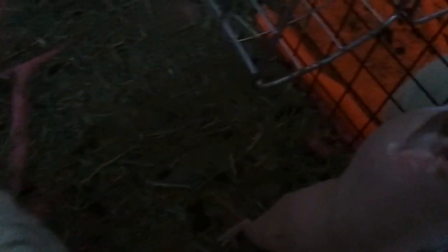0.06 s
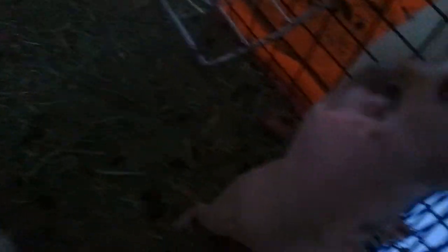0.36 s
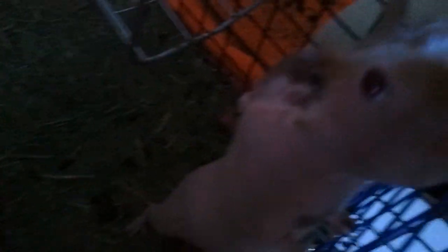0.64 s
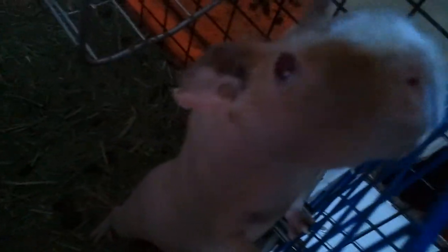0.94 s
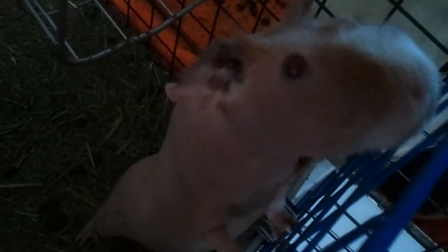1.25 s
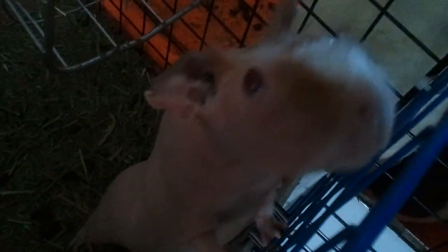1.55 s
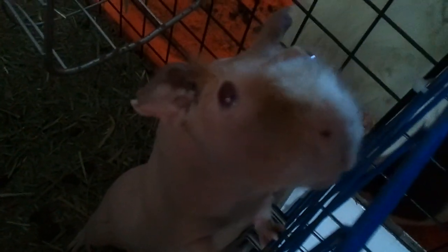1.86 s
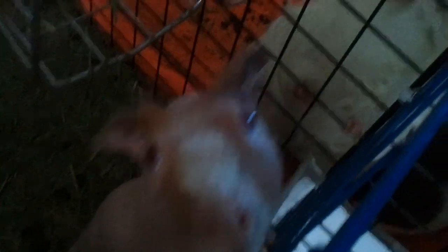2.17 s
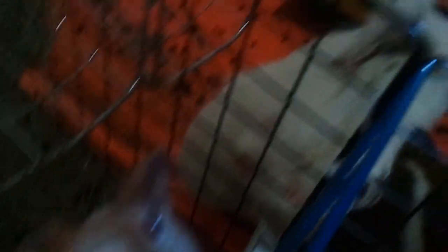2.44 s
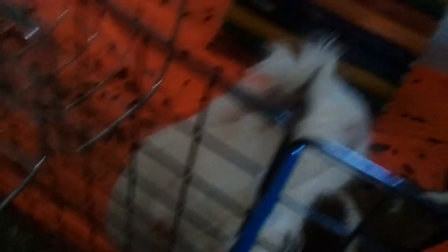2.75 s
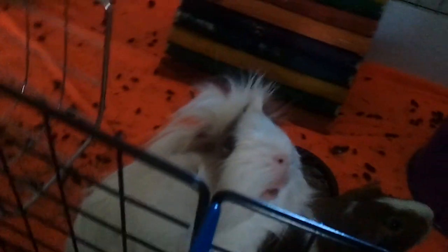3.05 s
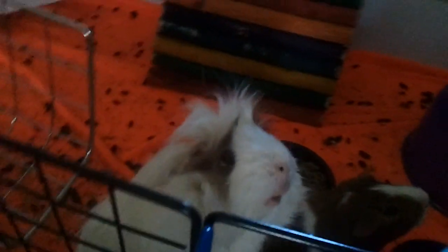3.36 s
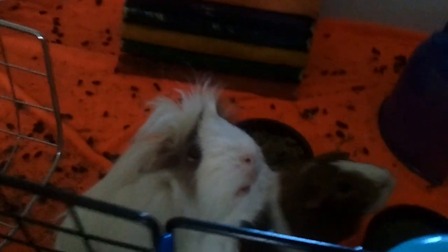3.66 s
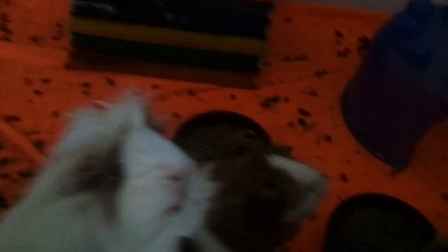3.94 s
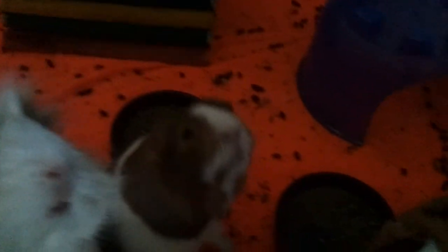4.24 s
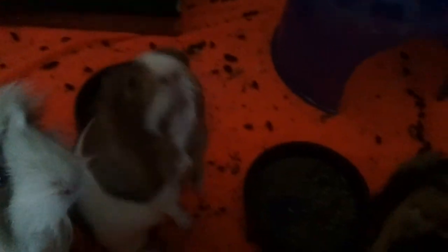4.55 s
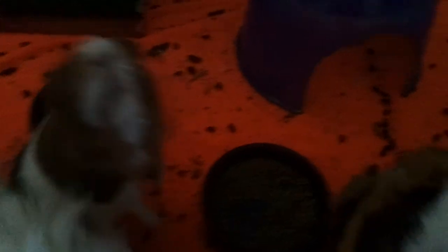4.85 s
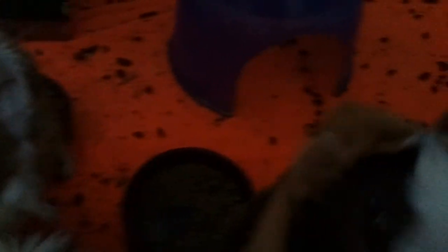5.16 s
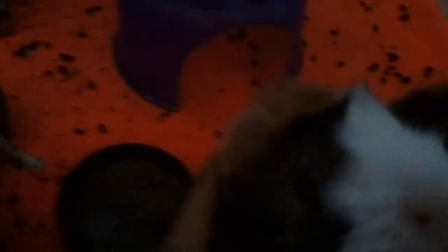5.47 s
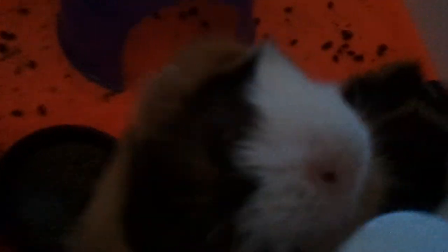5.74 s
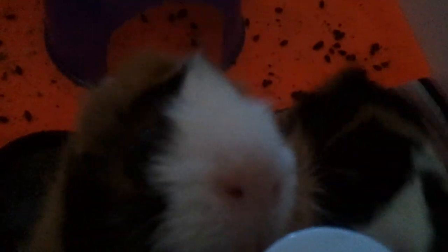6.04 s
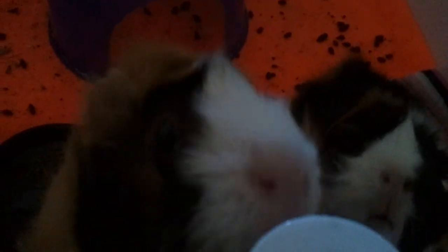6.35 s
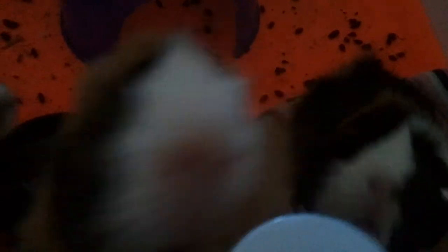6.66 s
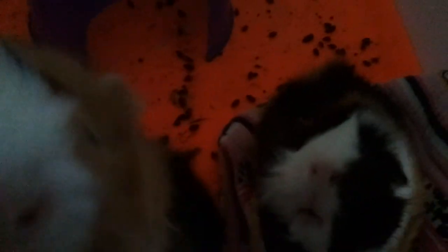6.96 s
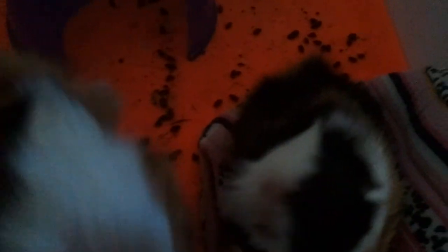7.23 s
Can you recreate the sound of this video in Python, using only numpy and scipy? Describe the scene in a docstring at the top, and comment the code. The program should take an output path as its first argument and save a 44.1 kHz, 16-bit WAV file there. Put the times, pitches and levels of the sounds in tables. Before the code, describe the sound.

Several guinea pigs squeak and whistle in quick rising calls over a hiss like running water and a low room hum.

```python
"""Overlapping wheeks of guinea pigs begging for food in an indoor pen: each call scoops low, then
the vocal folds tighten and whip it up into a whistle. Short peeps mix in; one animal squeals hoarsely.
A hiss like a running tap fills the room and dies away near the end, over a motor hum and rumble.
The pen is bumped a few times; late on, a stalk snaps and bedding rustles."""
import sys
import numpy as np
from scipy import signal
from scipy.fft import rfft, irfft
from scipy.io import wavfile

SR = 44100
rng = np.random.default_rng(int(sys.argv[2]) if len(sys.argv) > 2 else 0)


def wav_record(signal):
    """Record a signal, one row per channel, as 16-bit PCM in the file named by sys.argv[1]."""
    frames = np.transpose(np.atleast_2d(signal))
    bounded = np.clip(frames, -1, 1)
    # unit amplitude maps onto the largest positive 16-bit level
    quanta = np.round(bounded * 32767).astype(np.int16)
    wavfile.write(sys.argv[1], SR, quanta)


N = 330750
TIME_S = np.arange(N) / SR

# Wheeks: start/s, break/s, end/s, first f/Hz, knee f/Hz, top f/Hz, relative level/dB,
# whistle re scoop/dB, 2nd harmonic/dB, 3rd harmonic/dB
WHEEKS = [(0.0, 0.087, 0.115, 821, 969, 2310, -31.5, 4, -18, -27),
          (0.175, 0.236, 0.315, 706, 675, 2880, -43, 5, -1, -20),
          (0.255, 0.338, 0.352, 905, 650, 1450, -32.5, 12, -24, -13),
          (0.275, 0.372, 0.424, 702, 703, 1790, -38, -1, -11, -11),
          (0.524, 0.597, 0.709, 759, 706, 2954, -35, 0.5, -6, -28),
          (0.579, 0.671, 0.704, 700, 758, 1550, -37.5, 5, -9.5, -11),
          (0.881, 0.977, 1.114, 739, 691, 2970, -36, -3, -6, -11),
          (0.995, 1.068, 1.074, 687, 782, 1260, -38.5, -6, -5, -13),
          (1.177, 1.263, 1.313, 721, 700, 1517, -42, 8, -19, -11),
          (1.304, 1.424, 1.458, 570, 728, 1630, -40.5, 10, -8, -11),
          (1.327, 1.44, 1.47, 716.5, 807, 1960, -37.5, 10, -5, -21),
          (1.511, 1.583, 1.593, 664.5, 668, 1230, -40, -5, -11, -12),
          (1.631, 1.72, 1.726, 862, 635, 1330, -38, 6, -21, -24),
          (1.777, 1.849, 1.854, 793, 817, 1140, -38.5, 0, -23, -17),
          (1.816, 1.902, 1.913, 607, 568, 1260, -41, -6, -7, -9),
          (2.256, 2.334, 2.356, 744, 680, 1900, -37, -5, -15, -31),
          (2.309, 2.357, 2.387, 682, 642, 1530, -40, 0, -8, -8),
          (2.559, 2.633, 2.696, 774, 703, 2780, -34, -6, -11, -22),
          (2.828, 2.899, 2.996, 731, 693, 2960, -38.5, -4, -11, -24),
          (2.865, 2.93, 3.021, 739, 880, 2720, -38, -6, -12, -15),
          (3.133, 3.209, 3.248, 688, 705, 2840, -40.5, 2.5, -8, -19),
          (3.236, 3.335, 3.434, 739, 930, 3080, -41.5, 3, -4.5, -20),
          (3.308, 3.344, 3.363, 675, 756, 1324, -38, 10, -24, -22),
          (3.406, 3.446, 3.451, 781, 848, 1470, -36, -5, -18, -6),
          (3.549, 3.734, 3.852, 820, 784, 3020, -39.5, 5.5, -8, -3),
          (3.951, 4.056, 4.174, 668, 795, 3080, -38, 7.5, -8.5, -10.5),
          (4.028, 4.122, 4.178, 795, 763, 2770, -29.5, 4.5, -15, -7),
          (4.322, 4.442, 4.449, 706, 765, 1290, -30.5, 1, -12, -14.5),
          (4.473, 4.55, 4.552, 737, 803, 1520, -34, -3.5, -32, -21),
          (4.774, 4.842, 4.876, 799, 888, 2060, -27.5, -12, -18, -20),
          (4.924, 5.104, 5.143, 660, 885, 2660, -28, -5.5, -16, -10),
          (5.271, 5.352, 5.38, 818, 953, 2610, -31, 8, -14.5, -9),
          (5.432, 5.61, 5.641, 590, 984, 2950, -31.5, 13.5, -15.5, -17),
          (5.683, 5.846, 5.85, 610, 905, 1780, -30, 12, -10.5, -21),
          (5.765, 5.817, 5.818, 802, 894, 1390, -28.5, -11, -9, -11),
          (5.97, 6.124, 6.161, 656, 732, 1200, -35.5, -10, -8.5, -6.5),
          (5.995, 6.073, 6.075, 873, 735, 1400, -28.5, -20, -12.5, -18),
          (6.21, 6.296, 6.303, 858, 780, 1390, -28, -18, -21, -15),
          (6.423, 6.469, 6.498, 644, 816, 1192, -40.5, 4, -6.5, -8),
          (6.798, 6.814, 6.836, 970, 990, 1810, -41.5, 8, -15, -19)]
# Peeps: start/s, end/s, first f/Hz, last f/Hz, relative level/dB, 2nd harmonic/dB
PEEPS = [(0.0, 0.057, 685, 767, -41.5, -6), (0.048, 0.148, 554, 656, -40, -8),
         (0.303, 0.36, 525.6, 611, -38.5, -2.5), (0.748, 0.815, 742, 810, -37, -22),
         (0.832, 0.859, 933, 1030, -38, -12), (1.083, 1.137, 532, 626, -40.5, -15),
         (1.085, 1.114, 1096, 1080, -41.5, -7), (1.143, 1.176, 1170, 1184, -38, -23),
         (2.046, 2.1, 716, 768, -46, -23), (2.058, 2.135, 589, 584, -41.5, -8),
         (2.101, 2.161, 1148, 1047, -45, -16), (2.487, 2.568, 1010, 1276, -49, -15),
         (3.436, 3.518, 658, 842, -43, -14), (3.86, 3.897, 658, 672, -34.5, -14),
         (4.622, 4.729, 625, 806, -28.5, -9.5), (4.837, 4.869, 609, 653, -31, -11),
         (6.472, 6.522, 770, 809, -34.5, -18), (6.892, 6.945, 669, 777, -38, -20),
         (7.131, 7.185, 575, 870, -37.5, -6), (7.36, 7.434, 721, 747, -41, -22)]
# How well the voice carries: f/Hz, gain/dB
VOICE_CARRY = [(500, -3), (700, 1), (800, -2), (950, -2), (1200, 5), (1500, -5), (1800, -5.5), (2300, -5.5),
               (2700, 0), (3100, -3.5), (3500, -4)]
# Long whistle that sinks and climbs again: t/s, f/Hz, relative level/dB
LONG_WHISTLE = [(3.505, 752, -43), (3.555, 2334, -38), (3.61, 2407, -43), (3.655, 2045, -41),
                (3.705, 1392, -40), (3.735, 1630, -39), (3.765, 2810, -34.5), (3.82, 3390, -42)]
# Hoarse squeal: t/s, f/Hz, relative level/dB
SQUEAL = [(5.74, 1069, -48.5), (5.819, 1210, -41), (5.833, 1423, -38), (5.862, 1445, -40),
          (5.924, 1463, -37), (5.97, 1396, -47), (5.996, 1290, -40)]
# Squeal harmonics: number, gain/dB
SQUEAL_HARMONICS = [(1, -3), (2, -4), (3, 2), (4, -1), (5, -14.5)]
# Faint held whistle: t/s, f/Hz, relative level/dB
HELD_WHISTLE = [(5.84, 1159, -51), (5.89, 1134, -40.5), (6.02, 1120, -45), (6.2, 1165, -57),
                (6.55, 1133, -53), (6.78, 1167, -50.5)]
# Running water: t/s, level/dB
TAP_LEVEL = [(0, -35), (0.4, -35), (0.9, -36.5), (1.4, -38.5), (1.95, -36), (2.3, -37.5), (3.1, -40),
             (3.7, -38.5), (4.4, -36), (4.9, -32.5), (5.35, -35.5), (5.65, -35.5), (6.3, -38.5),
             (6.75, -42.5), (6.86, -49), (7.15, -56), (7.45, -57.5)]
# Water hiss: f/Hz, relative density/dB
TAP_SPECTRUM = [(500, -12.5), (900, -2.5), (1170, -4), (1650, -8.5), (2750, -5.5), (3600, -6), (5350, -3.5),
                (5520, 0), (5680, -3.5), (5850, 0), (6350, -2.5), (6850, -8.5), (7450, -19.5), (8000, -38)]
# Room rumble: t/s, level/dB
RUMBLE_LEVEL = [(0, -37), (1.9, -37), (3.0, -39.5), (3.8, -38.5), (4.7, -32.5), (6.0, -34.5), (7.5, -39)]
# Room rumble: f/Hz, relative density/dB
RUMBLE_SPECTRUM = [(15, -27.5), (30, -16), (42, -31.5), (50, -11), (72, -22.5), (95, -28), (150, -30),
                   (240, -30), (450, -37), (720, -37), (1000, -37.5), (1600, -41), (2000, -42.5),
                   (2800, -45), (6500, -66.5)]
# Faint room tones: f/Hz, peak re rumble/dB
ROOM_TONES = [(149, -13), (479.5, -21.5)]
# Motor hum: t/s, level/dB
HUM_LEVEL = [(0, -56), (.3, -34), (1.35, -47.5), (1.85, -34.5), (2.9, -43), (3.7, -45), (4.2, -34),
             (5.05, -49), (5.4, -36), (5.9, -49.5), (6.4, -45.5), (7.5, -51.5)]
# Bumps on the pen: t/s, thud level/dB, thud f/Hz, knock and tick trim/dB
BUMPS = [(0.313, -30, 118, -5), (0.859, -30, 155, -1), (1.219, -28, 122, -13), (4.177, -30.5, 81, 8.5),
         (4.686, -10.5, 101, -22), (4.748, -17.5, 86, -22), (7.383, -31, 132, -13)]
# Bedding rustles: start/s, length/s, level/dB
RUSTLES = [(6.919, .08, -36.5), (7.203, .03, -45)]
# Rustle, also the squeal's hiss: f/Hz, relative density/dB
RUSTLE_SPECTRUM = [(300, -18.5), (1200, -4), (3200, -2.5), (4500, -4.5), (6300, -5.5), (7500, -14.5)]


def from_db(db):
    return 10 ** (np.asarray(db) / 20)


def unit_rms(x):
    return x / np.sqrt(np.mean(x ** 2) + 1e-20)


def envelope(rows):
    """Gain over time from rows of t/s, level/dB."""
    return from_db(np.interp(TIME_S, *np.transpose(rows)))


def drift(rate_hz, size=N):
    """Slow random signal, rms about 1."""
    steps = np.arange(size) * rate_hz / SR
    return 1.2 * np.interp(steps, np.arange(4096), rng.standard_normal(4096))


def noise(spectrum):
    """Coloured noise, rms 1."""
    hz, db = np.transpose(spectrum)
    bins_hz = np.maximum(np.fft.rfftfreq(N, 1 / SR), 1)
    gain = from_db(np.interp(np.log(bins_hz), np.log(hz), db, left=-90, right=-90))
    return unit_rms(irfft(rfft(rng.standard_normal(N)) * gain, N))


def band(x, low_hz, high_hz):
    """Gentle band-pass, output rms 1."""
    return unit_rms(signal.sosfilt(signal.butter(2, [low_hz, high_hz], "band", fs=SR, output="sos"), x))


def add(out, start_s, sound):
    at = max(round(start_s * SR), 0)
    out[at:at + len(sound)] += sound[:max(N - at, 0)]


def room(x, early_db, tail_db, t60_s=.35):
    """Direct sound, close reflections off floor and walls, short diffuse tail."""
    t = np.arange(SR // 2) / SR
    tail = rng.standard_normal(len(t)) * from_db(-60 * t / t60_s) * np.clip(t / .031, 0, 1)
    early = np.zeros(len(t))
    early[(rng.uniform(.002, .02, 8) * SR).astype(int)] = rng.choice([-1, 1], 8)
    response = from_db(early_db) * early / np.linalg.norm(early)
    response += from_db(tail_db) * tail / np.linalg.norm(tail)
    return x + signal.fftconvolve(x, response)[:N]


def scoop(progress, first_hz, last_hz, sag=.0478):
    """Pitch of a call's low part: a glide that sags midway."""
    return first_hz * (last_hz / first_hz) ** progress * np.exp(-sag * np.sin(np.pi * progress))


def call_contour(t, hz, db, waver_db=1, waver_hz=90):
    """Rows of t/s, f/Hz, level/dB: effort wavers, and some pitches carry better."""
    waver = np.interp((t - t[0]) * waver_hz, np.arange(64), rng.standard_normal(64))
    carry_db = np.interp(hz, *np.transpose(VOICE_CARRY))
    return np.column_stack([t, hz, db + waver_db * waver + carry_db])


def wheek(start_s, break_s, end_s, first_hz, knee_hz, top_hz, db, whistle_db, second_db, third_db):
    """Contour and harmonics: the voice scoops, tightens to the break, whips up and levels off."""
    break_hz, tighten_s, tire_db = 1192, .017, .5
    t = np.linspace(start_s, end_s, 150)
    progress = np.interp(t, [start_s, break_s], [0, 1])
    tighten = (break_hz / knee_hz) ** np.exp(np.minimum(t - break_s, 0) / tighten_s)
    whip = (top_hz / break_hz) ** np.sin(np.interp(t, [break_s, end_s], [0, np.pi / 2]))
    hz = scoop(progress, first_hz, knee_hz) * tighten * whip
    effort_db = db + tire_db * (.5 - progress) + np.interp(hz, [1100, 2520], [0, whistle_db])
    return call_contour(t, hz, effort_db), [(1, 0), (2, second_db), (3, third_db), (4, third_db - 11.5)]


def peep(start_s, end_s, first_hz, last_hz, db, second_db):
    """Contour and harmonics of a scoop that never breaks."""
    t = np.linspace(start_s, end_s, 50)
    hz = scoop(np.linspace(0, 1, len(t)), first_hz, last_hz)
    return call_contour(t, hz, db), [(1, 0), (2, second_db), (3, -16.5)]


def voice(contour, harmonics, jitter=.016, jitter_rate_hz=450, shimmer_db=2.04, edge_s=.0047,
          mouth_hz=2900, thin_db_per_octave=0, rest_hz=700):
    """Vocal folds track a contour, trembling more as they tighten; overtones fade above mouth_hz."""
    knots_s, hz, db = np.transpose(contour)
    t = np.arange(knots_s[0], knots_s[-1] + edge_s, 1 / SR)
    aim_hz = np.exp(np.interp(t, knots_s, np.log(hz)))
    strain = np.sqrt(np.minimum(aim_hz / 1000, 2))
    pitch_hz = aim_hz * np.exp(jitter * strain * drift(jitter_rate_hz, len(t)))
    phase = 2 * np.pi * np.cumsum(pitch_hz) / SR
    tone = 0
    for k, harmonic_db in harmonics:
        gain = from_db(harmonic_db + shimmer_db * strain * min(k, 2) * drift(150, len(t)))
        if k > 1:
            gain *= from_db(-thin_db_per_octave * np.log2(aim_hz / rest_hz))
            gain /= np.sqrt(1 + (k * pitch_hz / mouth_hz) ** 20)
        tone += gain * np.sin(k * phase)
    rasp = 1 + .22 * strain * drift(900, len(t))  # uneven cycles
    gate = np.sin(np.pi / 2 * np.clip(np.minimum(t - t[0], t[-1] - t) / edge_s, 0, 1)) ** 2
    return np.sqrt(2) * tone * rasp * gate * from_db(np.interp(t, knots_s, db))


def loudest_db(contour):
    return max(db for _, _, db in contour)


def guinea_pigs(near_db=-31, far_db=-38):
    """All calls in the room; fainter callers sit farther back, with more reverberation."""
    near, far = np.zeros((2, N))
    calls = [wheek(*row) for row in WHEEKS] + [peep(*row) for row in PEEPS]
    calls.append((LONG_WHISTLE, [(1, 2.5), (2, -3.5)]))
    for contour, harmonics in calls:
        call = from_db(-1) * voice(contour, harmonics, thin_db_per_octave=5.5)
        far_share = np.clip((near_db - loudest_db(contour)) / (near_db - far_db), 0, 1)
        add(near, contour[0][0], (1 - far_share) * call)
        add(far, contour[0][0], far_share * call)
    add(near, SQUEAL[0][0], squeal())
    add(far, HELD_WHISTLE[0][0], voice(HELD_WHISTLE, [(1, 2.5), (2, -6.5)], jitter=.013, edge_s=.02))
    near = room(near + squeal_hiss(), early_db=-10.5, tail_db=-11.5)
    return near + room(far + chatter(), early_db=-7.5, tail_db=-4)


def tap(flutter_db=.55, drops_per_s=1400):
    """Running water: smooth hiss and a little spatter, coloured by nearby walls."""
    hiss = noise(TAP_SPECTRUM) * from_db(flutter_db * drift(40))
    drops = rng.choice([-1, 1], N) * (rng.random(N) < drops_per_s / SR)
    water = from_db(-1.41) * hiss + from_db(-17) * band(drops, 3800, 5900)
    return envelope(TAP_LEVEL) * room(water, early_db=-8.5, tail_db=-10)


def motor_hum(hum_hz=55.2, wander_hz=.66):
    """One low motor tone, wavering in pitch and level."""
    phase = 2 * np.pi * np.cumsum(hum_hz + wander_hz * drift(2.5)) / SR
    return envelope(HUM_LEVEL) * np.sqrt(2) * np.sin(phase)


def rumble():
    """Low room noise with two faint tones."""
    tones = sum(from_db(db + 2 * drift(1.6)) * np.sin(2 * np.pi * hz * TIME_S) for hz, db in ROOM_TONES)
    return envelope(RUMBLE_LEVEL) * (noise(RUMBLE_SPECTRUM) + tones)


def bumps(thud_s=.0065, knock_s=.017, tick_s=.0036):
    """Each bump: a low, heavily damped swing of the pen, a knock, a tick of its bars."""
    out, t = np.zeros(N), np.arange(SR // 4) / SR
    for start_s, db, hz, trim_db in BUMPS:
        thud = t / thud_s * np.exp(1 - t / thud_s) * np.sin(2 * np.pi * hz * t)
        knock = band(rng.standard_normal(len(t)), 110, 570) * np.exp(-t / knock_s)
        tick = band(rng.standard_normal(len(t)), 900, 3600) * np.exp(-t / tick_s)
        add(out, start_s, from_db(db) * (thud + from_db(trim_db) * (.5 * knock + .85 * tick)))
    return out


def chatter(count=11):
    """Faint wheeks from the back of the pen, loosely timed, in the first seconds."""
    out = np.zeros(N)
    for start_s in np.linspace(.4, 2.7, count) + rng.uniform(-.1, .1, count):
        contour, _ = wheek(*WHEEKS[rng.integers(len(WHEEKS))])
        call = voice(contour, [(1, 0), (2, -11)])
        add(out, start_s, call * from_db(-46 - loudest_db(contour)))
    return out


def squeal():
    """Hoarse voice: fast, deep pitch jitter and strong overtones."""
    return voice(SQUEAL, SQUEAL_HARMONICS, jitter=.03, jitter_rate_hz=1300, shimmer_db=1.8,
                 edge_s=.01, mouth_hz=8000)


def squeal_hiss():
    """The squeal breaks up into hiss."""
    return envelope([(5.9, -88), (5.94, -34), (5.975, -28), (6.0, -87)]) * noise(RUSTLE_SPECTRUM)


def bedding(attack_s=.043, release_s=.035, snap_at_s=6.8915, snap_db=-31, snap_decay_s=.0028):
    """A stalk snaps, then bedding brushes in quick, uneven bursts."""
    gain = np.zeros(N)
    for start_s, length_s, db in RUSTLES:
        swell = np.clip((TIME_S - start_s) / attack_s, 0, 1)
        fade = np.exp(-np.maximum(TIME_S - start_s - length_s, 0) / release_s)
        gain += from_db(db) * swell * fade
    gain *= from_db(1.5 * drift(200))
    add(gain, snap_at_s, from_db(snap_db) * np.exp(-TIME_S / snap_decay_s))
    return gain * noise(RUSTLE_SPECTRUM)


def scene():
    """Mono mix of animals, room noises and pen."""
    return (from_db(-.5) * guinea_pigs() + tap() + motor_hum() + rumble() + bumps() + bedding())[None]


def record(dry, cutoff_hz=7450, dc_offset=-.0865):
    """Narrow-band recorder: steep top cut, converter resting off zero."""
    return signal.sosfilt(signal.ellip(10, .2, 80, cutoff_hz, fs=SR, output="sos"), dry) + dc_offset


dry = scene()
out = record(dry)
wav_record(out)
```